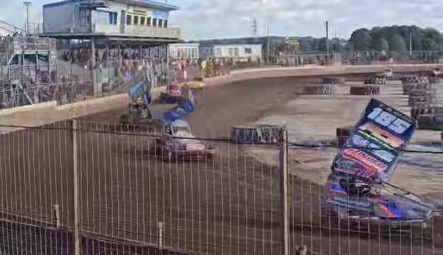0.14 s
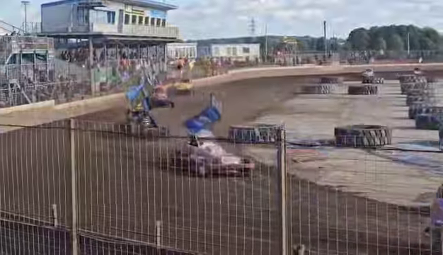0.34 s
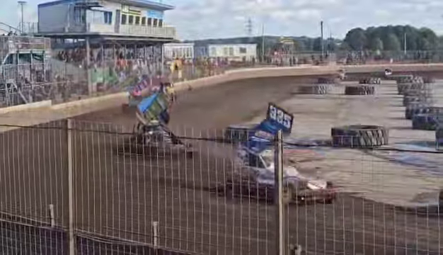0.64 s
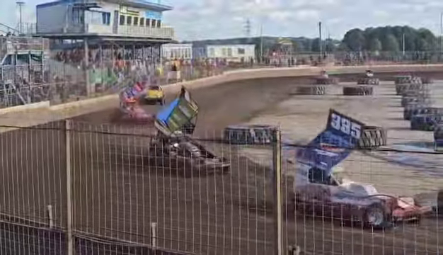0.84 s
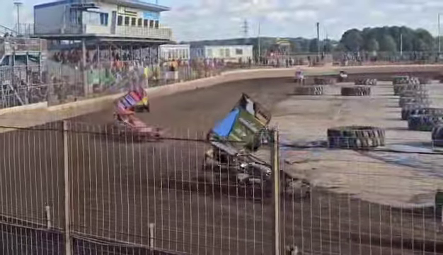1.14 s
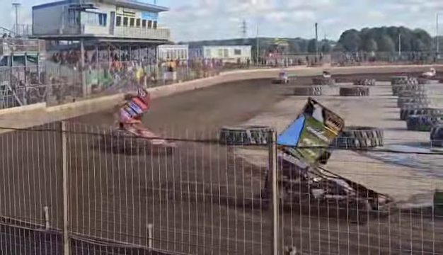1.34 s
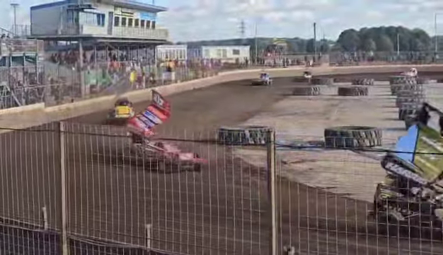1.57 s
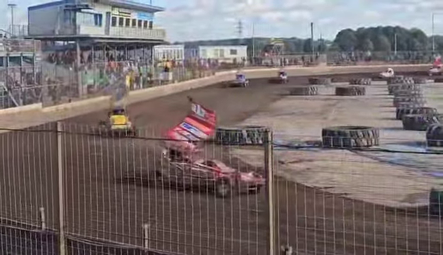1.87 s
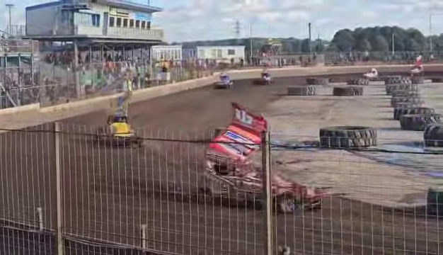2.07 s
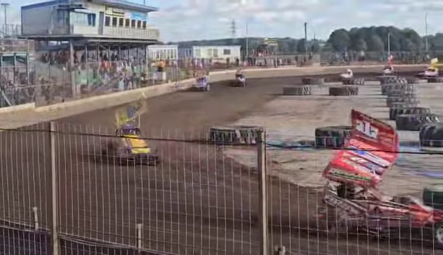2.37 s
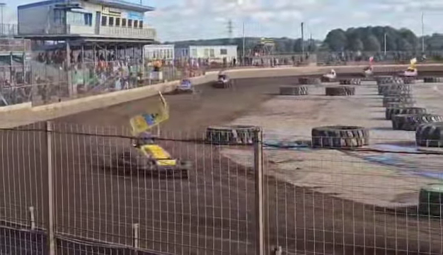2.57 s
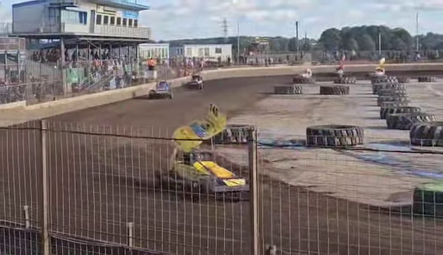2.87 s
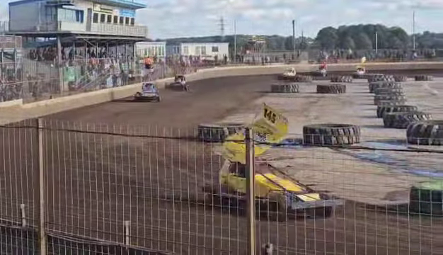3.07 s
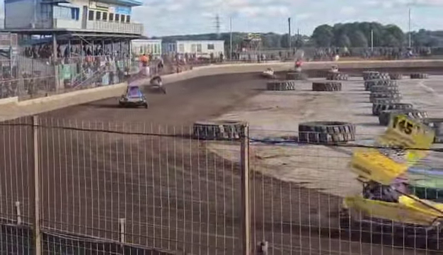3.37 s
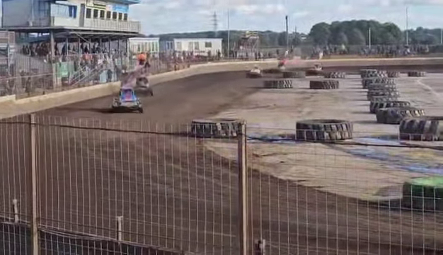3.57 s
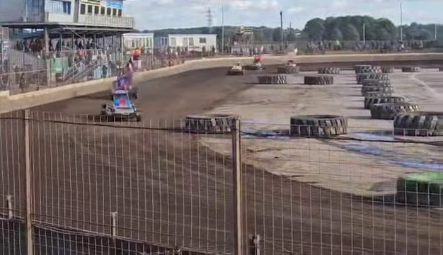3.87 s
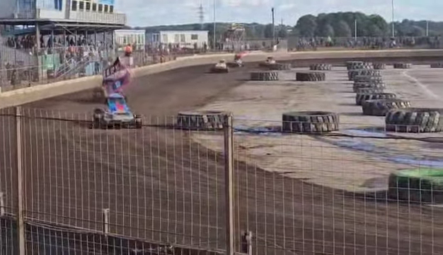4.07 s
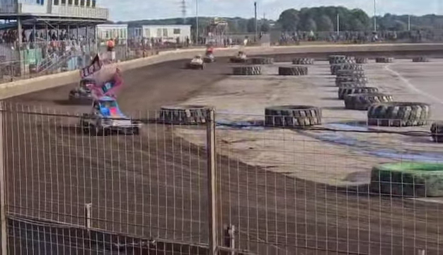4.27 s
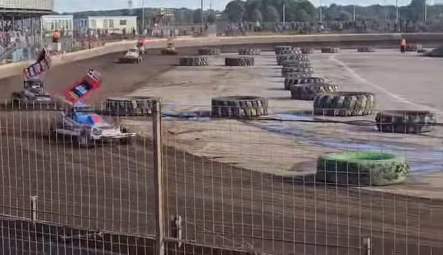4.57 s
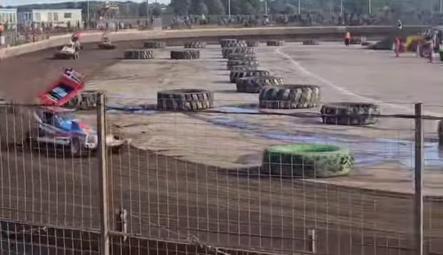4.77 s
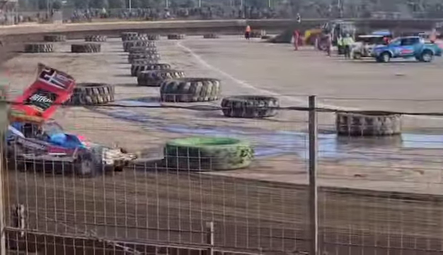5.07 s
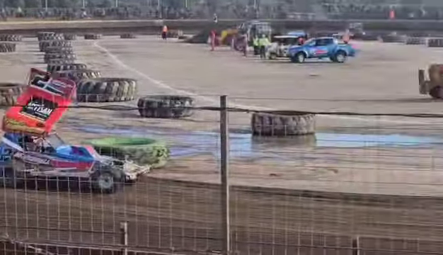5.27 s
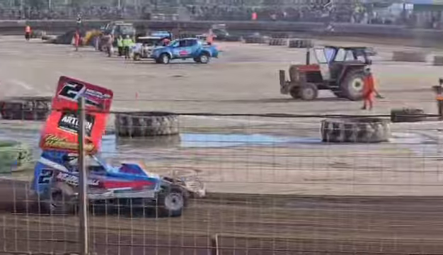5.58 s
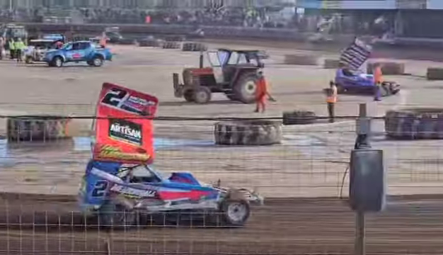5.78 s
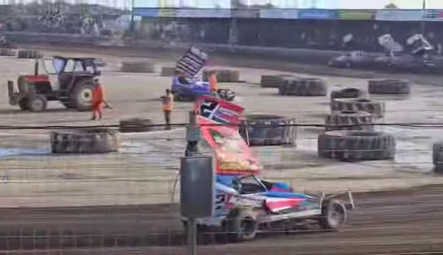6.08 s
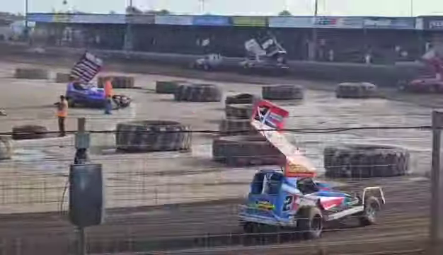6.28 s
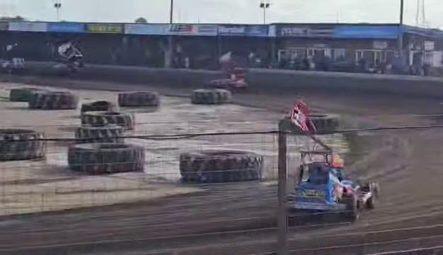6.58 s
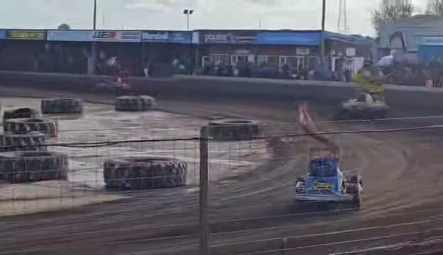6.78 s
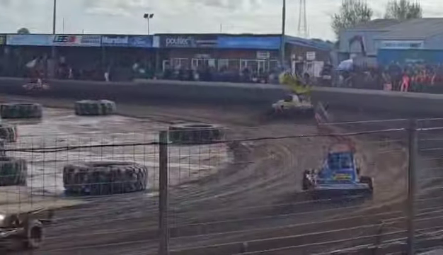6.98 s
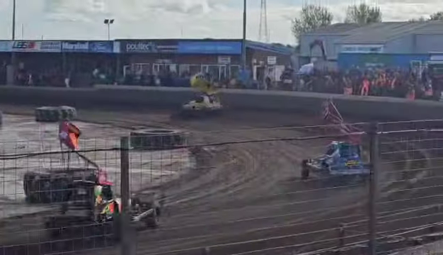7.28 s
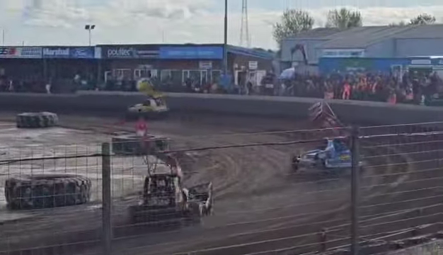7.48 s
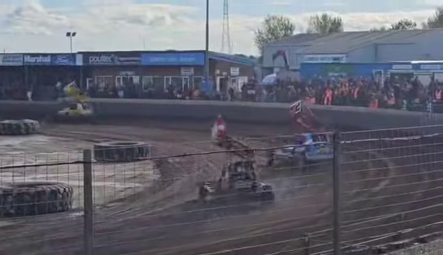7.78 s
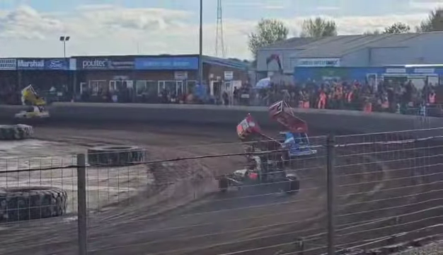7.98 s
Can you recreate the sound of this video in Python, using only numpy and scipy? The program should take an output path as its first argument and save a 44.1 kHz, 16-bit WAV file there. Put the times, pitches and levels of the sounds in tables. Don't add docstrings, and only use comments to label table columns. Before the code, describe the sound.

A pack of V8 race cars drones around an outdoor dirt oval, heard in stereo from a phone behind a wire fence. Close cars pass with cracking rasp and bright gas hiss, most densely in the first two and a half seconds, as stones snap on the wire. After a thinner stretch of distant growl, another car blasts by near five and a half seconds, then one more near seven.

```python
import sys
import numpy as np
from scipy import signal
from scipy.fft import rfft, irfft, next_fast_len
from scipy.io import wavfile
from scipy.ndimage import uniform_filter1d, map_coordinates

SR = 44100
rng = np.random.default_rng(int(sys.argv[2]) if len(sys.argv) > 2 else 0)


def store_pcm(level_fs):
    pcm = np.round(np.clip(level_fs, -1, 1) * 32767).astype(np.int16)
    wavfile.write(sys.argv[1], SR, np.atleast_2d(pcm).T)


def volts(x):
    e = np.asarray(x, float) / 20
    return 10 ** e


N = 358974


def unit(x):
    return x / np.sqrt(np.mean(x ** 2) + 1e-20)


def along(points, hz):
    f, v = np.transpose(points)
    return np.interp(np.log(hz + 1), np.log(f + 1), v)


def curves(rows):
    s, *cols = np.transpose(rows)
    return [np.interp(np.arange(N) / SR, s, c) for c in cols]


def wobble(rate):
    coarse = np.arange(0, N + 64, 32)
    knots = rng.standard_normal(int(N * rate / SR) + 4)
    return np.interp(np.arange(N), coarse, map_coordinates(knots, [coarse * rate / SR]))


def coloured(x, points):
    m = 16384
    gain = volts(along(points, np.fft.rfftfreq(m, 1 / SR)))
    cep = irfft(np.log(gain + 1e-6), m)
    cep[1:m // 2] *= 2
    cep[m // 2 + 1:] = 0
    impulse = irfft(np.exp(rfft(cep)), m)
    size = next_fast_len(N + m)
    return irfft(rfft(x, size) * rfft(impulse, size), size)[..., :N]


def patchy(x, depth_db):
    z = signal.stft(x, nperseg=512)[2]
    field = uniform_filter1d(rng.standard_normal(z.shape), size=4, axis=0)
    field = uniform_filter1d(field, size=6, axis=1)
    return signal.istft(z * volts(depth_db * unit(field)), nperseg=512)[1][:N]


def exhaust_orders():
    # [start/s, length/s, pitch/Hz, level/dB]
    holds = [(0, 0.21, 257.7, -16), (0.2, .2, 243, -16.5), (0, .65, 92, -21.5), (0.7, 0.29, 313.3, -29.5),
             (1.35, 0.14, 500, -27.5), (1.14, 0.19, 254.2, -18.5), (1.32, 0.5, 216, -20.5),
             (1.7, 0.34, 102, -23), (1.9, 0.32, 358.3, -30), (2, 0.34, 294, -27), (2.3, 0.16, 242.1, -18.5),
             (2, 0.51, 89, -20.5), (2.5, 0.43, 258, -22.5), (2.559, 0.26, 95, -25),
             (2.852, 0.26, 90.3, -24.5), (2.5, 0.25, 156, -27), (3, 0.29, 92, -25.5),
             (3.421, .13, 96.5, -20), (3.5, 0.18, 250, -21.5), (3.5, 0.284, 243.2, -18.5),
             (3.8, 0.31, 275, -23.5), (3.5, .69, 103, -24.5), (3.898, 0.27, 353, -31),
             (4, 0.17, 580, -32.5), (4, 0.13, 545, -29), (4, 0.18, 245, -22), (4.5, 0.12, 320.5, -25.5),
             (5.0, 0.23, 245, -19), (5.5, 0.453, 224, -18), (6, .25, 224, -23), (6.5, 0.22, 238, -21),
             (6.5, 0.13, 372, -30.5), (7, 0.34, 172, -24), (6.5, 0.39, 103, -26.5), (7, 0.17, 416, -24),
             (7.5, 0.35, 240, -25.5), (7.781, 0.46, 420.3, -31), (7.749, 0.49, 540, -35.5),
             (8, 0.36, 163, -24), (0.7, .14, 277, -23), (0.3, .2, 152, -25), (5, .12, 196, -22),
             (6, .16, 138, -26), (7, 0.18, 101, -26), (7.33, .2, 86, -28.5), (7.5, .25, 265, -24.5),
             (7.85, .3, 68, -30.5), (7, .25, 237, -26),
             (2.2, .42, 51, -33), (2.95, .95, 47, -40), (5.27, .36, 47, -36), (4.52, .3, 240, -25.5),
                (3.4, .2, 252, -25), (4.05, .3, 262, -29), (4.55, .3, 560, -33.5), (5.05, 0.31, 520, -32),
                (1.2, .18, 135, -24), (6.3, .4, 50, -42), (7.48, .15, 380, -30)]
    # [start/s, length/s, from/Hz, to/Hz, level/dB]
    glides = [(0.301, 0.27, 246, 283.6, -20.5), (0.215, 0.41, 334, 360, -36),
              (0.45, 0.97, 250, 239.3, -25.5), (0.737, 0.22, 276, 322.8, -22.5),
              (0.558, 0.33, 180, 166, -22), (.86, 0.33, 172, 189.2, -23.5), (0.65, 0.557, 100, 114, -22),
              (0.954, 0.25, 79, 75.7, -26), (1.4, 0.554, 80, 89.9, -25), (1.418, 0.23, 286, 297, -26),
              (1.702, 0.2, 240, 291, -20.5), (2.14, 0.163, 216, 250, -19.5),
              (2.623, 0.426, 211, 222.5, -20.5), (3.093, 0.388, 227, 248.2, -24),
              (3.799, 0.61, 230, 211.5, -22.5), (4.5, 0.57, 203, 233, -18.5),
              (5.199, 0.44, 230, 242.4, -21), (5.52, 0.408, 174, 216.8, -19), (5.55, 0.167, 458, 493, -26),
              (5.919, 0.459, 76, 101.6, -28.5), (7.16, 0.27, 184, 207.4, -22),
              (7.25, 0.53, 166, 156.6, -26.5), (7.624, 0.47, 228, 264, -27.5), (6.3, .26, 86, 98, -28),
              (5.25, 0.298, 275, 310, -26), (1.95, 0.203, 180, 140, -24), (4.4, .22, 228, 243, -22)]
    # [start/s, length/s, from/Hz, top/Hz, level/dB]
    blips = [
        (2.236, 0.283, 420, 449, -22.5),
        (6.1, .66, 170.1, 205.8, -19.5),
    ]
    fade_s = .12
    flutter_db = .8 * wobble(14) + 1.04 * wobble(5)
    drift_hz = 1.2 * wobble(20) + 1.41 * wobble(7)

    def ramp(u):
        return u

    def arch(u):
        return np.sin(np.pi * u) ** 2

    played = [(s, n, hz, hz, db, ramp) for s, n, hz, db in holds]
    played += [(*r, ramp) for r in glides] + [(*r, arch) for r in blips]
    out = np.zeros(N)
    for k, (s, length, from_hz, to_hz, db, shape) in enumerate(played):
        first = max(round((s - fade_s / 2) * SR), 0)
        last = min(round((s + length + fade_s / 2) * SR), N)
        i = np.arange(first, last)
        t = i / SR - s
        own = (i + 50021 * k) % N
        fade = np.clip(np.minimum(t, length - t) / fade_s + .5, 0, 1)
        hz = from_hz + (to_hz - from_hz) * shape(np.clip(t / length, 0, 1))
        turn = 2 * np.pi * np.cumsum(hz + drift_hz[own]) / SR
        out[i] += fade * volts(db + 3.5 + flutter_db[own]) * np.sin(turn + k)
    return out


def throttle():
    # [t/s, level/dB]
    across = [
        (0, -29.5),
        (.4, -32.5),
        (.8, -28.5),
        (1.5, -29.5),
        (2.8, -31.5),
        (3.55, -26),
        (4.5, -26),
        (4.95, -27.5),
        (6.6, -28.5),
        (8.14, -26),
    ]
    # [start/s, length/s, hiss level/dB, rasp level/dB]
    close_cars = [(-.05, 0.17, -29, -28), (0.257, 0.094, -27.5, -60), (0.492, 0.24, -32, -31.5),
                  (0.84, 0.28, -53, -53), (1.148, 0.14, -64, -25), (1.247, 0.16, -39, -31.5),
                  (1.41, 0.41, -43.5, -55), (1.674, 0.35, -34, -36), (1.792, 0.17, -29, -38),
                  (2.048, 0.21, -27, -26), (2.229, 0.13, -24.5, -26), (2.351, 0.17, -26.5, -30),
                  (2.525, 0.098, -36, -47), (2.706, .06, -48, -58), (2.95, 0.027, -37, -59),
                  (2.76, 0.2, -55, -58), (3.68, 0.34, -44.5, -57), (4.42, 0.096, -43.5, -25),
                  (5.148, 0.61, -41, -31.5), (5.328, 0.037, -31, -50), (5.375, .035, -30, -50),
                  (5.477, 0.07, -24, -31), (5.555, 0.23, -26, -29.5), (5.754, 0.18, -26.5, -28.5),
                  (5.934, 0.53, -32, -34.5), (6.457, 0.24, -43.5, -38), (6.71, 0.6, -37.5, -30.5),
                  (7.048, 0.21, -28, -30), (7.202, 0.13, -25, -38), (7.293, 0.12, -22.5, -32),
                  (7.439, 0.15, -27, -39), (3.837, 0.1, -45, -50), (0.136, 0.085, -34.5, -48)]
    open_s, shut_s, far_hiss_db = 0.073, 0.086, -50.5
    t = np.arange(0, N + 64, 64) / SR
    s, length, hiss_db, rasp_db = np.transpose(close_cars)[..., None]
    opening = np.minimum((t - s) / open_s + .5, (s + length - t) / shut_s + .5)
    opening = np.clip(opening, 0, 1) ** 2
    rasp = volts(2 * np.interp(t, *np.transpose(across))) + ((volts(rasp_db) * opening) ** 2).sum(0)
    hiss = volts(2 * far_hiss_db) + ((volts(hiss_db) * opening) ** 2).sum(0)
    return [np.interp(np.arange(N) / SR, t, 10 * np.log10(p)) for p in (rasp, hiss)]


def closeness():
    return np.clip((throttle()[1] + 44) / 14, 0, 1)


def firings(cycle_hz, uneven, jitter, scatter_db):
    turns = np.cumsum(cycle_hz) * 8 / SR
    at = np.flatnonzero(np.diff(np.floor(turns)) > 0)
    pattern = 1 + uneven * rng.standard_normal(8)
    luck = rng.standard_normal((N // 50, 2))[:len(at)]
    size = pattern[np.arange(len(at)) % 8] * volts(scatter_db * luck[:, 0])
    late = jitter * luck[:, 1] * SR / 8 / cycle_hz[at]
    return np.bincount(np.clip(at + late, 0, N - 1).astype(int), size, N)


def near_cars():
    # [t/s, cycle/Hz]
    engine_cycle = [(0, 31.3), (.9, 38.4), (1.6, 44), (2.2, 46), (2.28, 55), (2.37, 56), (2.56, 51),
                    (2.8, 20), (5.5, 36), (6.1, 27.6), (7, 34), (7.4, 49.7), (7.7, 51)]
    # [f/Hz, level/dB]
    close_rasp = [(220, -42), (380, -5.5), (436, -3.5), (533, -6.5), (1430, -17.5), (1710, -23),
                  (2600, -28.5), (3380, -103), (5720, -120)]
    distant_rasp = [(220, -16.5), (380, -3.5), (422, -1), (646, -2.5), (951, -13.5), (1030, -14),
                    (2600, -40), (3380, -49.5), (5720, -120)]
    # [f/Hz, level/dB]
    behind_hiss = [(1470, -46), (2700, -6), (4340, -0.5), (5120, 0.5), (6820, -1), (7470, 2.5), (8700, -6),
                   (10300, -7.5), (11600, -2.5), (13200, -16.5)]
    side_hiss = [(1350, -15.5), (2300, -10.5), (2900, -7.5), (5220, 0), (5990, -5.5), (7410, -4.5),
                 (9850, -17.5), (11700, -13), (13200, -22)]
    distant_hiss = [(1350, -26), (2300, -10.5), (2660, -6.5), (4320, -3), (5910, -9), (7150, -11.5),
                    (9940, -22), (11400, -23), (13200, -22.5)]
    rasp_db, hiss_db = throttle()
    beats = firings(curves(engine_cycle)[0], uneven=.4, jitter=0.05, scatter_db=1.0)
    puff_s = 0.0018
    puff = unit(np.abs(signal.lfilter([1], [1, -np.exp(-1 / (puff_s * SR))], beats)))
    load = closeness()

    def jet(steady):
        return rng.standard_normal(N) * (steady + load * puff) / (steady + load)

    cracks = patchy(0.35 * load * unit(beats) + jet(1.0), depth_db=1.5)
    rasp = np.sqrt(load) * unit(coloured(cracks, close_rasp))
    rasp = rasp + np.sqrt(1 - load) * unit(coloured(cracks, distant_rasp))
    sputter_db = 0.81 * wobble(9.7) + load * 2.2 * wobble(190)
    gas = patchy(jet(2.6) * volts(sputter_db), depth_db=2.5)
    turned = np.interp(np.arange(N) / SR, (0.92, 3.7), [0, 1])
    behind = (1 - turned) * np.maximum(load, .39)
    side = turned * load
    shares = [(behind, behind_hiss), (side, side_hiss), (1 - behind - side, distant_hiss)]
    hiss = sum(np.sqrt(np.abs(share)) * unit(coloured(gas, colour)) for share, colour in shares)
    return volts(rasp_db - 1.0) * rasp + volts(hiss_db - 1.72) * hiss


def bursts():
    # [t/s, cycle/Hz, level/dB, pipe resonance/Hz]
    passes = [
        [(1.99, 38.14, -41, 610), (2.06, 39.6, -29.5, 641), (2.18, 41.7, -28, 663), (2.27, 42, -36, 690)],
        [(2.22, 52.1, -40, 1040), (2.29, 54.34, -23.5, 1070), (2.37, 56.6, -25, 1010), (2.48, 53.7, -21, 1023),
         (2.57, 51.3, -43, 1000)],
        [(5.42, 55, -47, 1060), (5.6, 57.85, -32, 1060), (5.75, 60.7, -48, 1080), (5.93, 60, -33, 1060)],
        [(6.03, 27.9, -27.5, 880), (6.2, 28.14, -30, 829.7), (6.33, 29, -29.5, 790), (6.47, 30.2, -28, 799)],
        [(7.15, 51.06, -36, 1020), (7.28, 52.73, -26, 1050), (7.4, 54.1, -28, 980), (7.5, 52.4, -26.5, 890),
         (7.61, 50.9, -43, 815)],
    ]
    pipe_width = .085
    out = np.zeros(N)
    order = np.arange(9, 44)[:, None]
    for rows in passes:
        s, cycle_hz, db, pipe_hz = np.transpose(rows)
        i = np.arange(round(s[0] * SR), round(s[-1] * SR))
        cycle, level, pipe = (np.interp(i / SR, s, c) for c in (cycle_hz, db, pipe_hz))
        knots = rng.standard_normal((2, len(order), 6))
        shake, swell = (signal.resample(k, len(i), axis=1) for k in knots)
        gain = .65 * (12 / order) ** 1.64
        for ratio, peak in [(1, 1), (1.36, .8), (1.95, .3)]:
            gain = gain + peak * np.exp(-(np.log(order * cycle / (ratio * pipe)) / pipe_width) ** 2)
        phase = order * 2 * np.pi * np.cumsum(cycle) / SR + .25 * shake + order ** 2
        stack = gain * volts(2.5 * swell) * np.sin(phase)
        out[i] += volts(level - 0.5) * signal.windows.tukey(len(i), .25) * unit(stack.sum(0))
    return out


def grit():
    # [t/s, peak level/dB, ring/Hz]
    stones = [(0.2652, -28, 6160), (0.2856, -29, 11300), (0.2975, -9.5, 7600), (0.4763, -21, 5160),
              (1.293, -28, 4970), (1.3049, -24, 5030), (1.65, -18, 7300), (1.6664, -15, 4530),
              (1.6885, -19, 5270), (1.725, -10, 7150), (1.7373, -4.5, 6900), (1.7892, -17, 7060),
              (1.8002, -11, 7600), (1.8406, -18, 6620), (1.89, -9, 7460), (1.9067, -2, 7460),
              (2.0886, -22, 5500), (2.1783, -15, 7480), (2.1967, -8, 6330), (2.257, -17, 7300),
              (2.3849, -16, 4870), (2.4068, -13, 6850), (2.4794, -19, 6530), (2.5565, -15, 8300),
              (2.7296, -21, 4400), (2.9574, -23, 7320), (3.7263, -24, 5270), (3.854, -31, 4500),
              (3.868, -18, 5200), (3.9294, -20, 4670), (5.3347, -27, 6450), (5.3476, -23, 7100),
              (5.3842, -15, 6230), (5.4983, -17, 6380), (5.5741, -24, 6480), (5.5996, -19, 7420),
              (5.7984, -32, 7270), (6.0045, -12, 5340), (6.2411, -13, 6600), (6.294, -17, 5260),
              (7.0458, -23, 7430), (7.0692, -23, 5360), (7.2618, -18, 6420), (7.3147, -26, 6740),
              (7.38, -22, 7430)]
    # [f/Hz, level/dB]
    wire = [(1500, -30), (4000, -1), (7500, 1), (9500, -3), (11500, 0), (13000, -10), (14000, -90)]
    out, t = np.zeros(N + 600), np.arange(600) / SR
    for s, db, hz in stones:
        crack = np.diff(rng.standard_normal(len(t) + 1)) * volts(-60 * t / .004)
        ring = 0.6 * np.sin(2 * np.pi * hz * t) * volts(-60 * t / .009)
        out[round(s * SR):][:len(t)] += volts(db - 2) * (crack + ring)
    return coloured(out[:N], wire)


def blurred_pack(count=9):
    # [t/s, level/dB]
    strength = [(0.0, -17), (1.49, -16.5), (2.29, -15), (3.08, -18), (4.71, -16), (5.35, -14.5),
                (5.78, -20), (6.12, -18), (6.51, -23.5), (6.94, -17), (7.46, -20), (8.14, -17.5)]
    # [f/Hz, level/dB]
    burble_colour = [(18, -49), (30, -11), (59, -10), (91, -0.5), (150, -9.5), (200, -31), (330, -120)]
    drone_colour = [(82, -33.5), (140, -6.5), (167, -5.5), (236, 3.5), (307, -6.5), (420, -18.5),
                    (550, -44), (920, -120)]
    drone_db, = curves(strength)
    burble_db = drone_db - 4.5 - .5 * np.arange(N) / SR
    blur = 0
    for mean_hz in np.linspace(24, 40, count):
        level = volts(2.95 * wobble(1.607))
        cycle_hz = mean_hz * (1 + .06 * wobble(1.2))
        blur = blur + level * unit(firings(cycle_hz, uneven=2.18, jitter=.05, scatter_db=2))
    blur = unit(blur) + 0.42 * rng.standard_normal(N)
    burble = volts(burble_db - 2.0) * unit(coloured(blur, burble_colour))
    return burble + volts(drone_db - 2.5) * unit(coloured(blur, drone_colour))


def placed(x):
    # [from/s, to/s, left lag at start/samples, at end/samples]
    sweeps = [(0, .2, 0, 2), (.2, .5, 3, 5), (.5, 1.22, 17, 18), (1.22, 1.36, 2, 3), (1.36, 1.62, 19, 20),
              (1.62, 1.98, 7, 7.4), (1.98, 2.44, 0, 0), (2.44, 2.76, 7.2, 5.8), (2.74, 5, 18, 18),
              (5, 5.42, 17, 12), (5.42, 5.95, -2, -1.5), (5.95, 6.24, -10.5, -10), (6.24, 6.6, -14, -14),
              (6.6, 6.95, -11, -9.3), (6.95, 7.43, -7.7, -4.4), (7.43, 8.2, -3.5, -1)]
    out, t, x = np.zeros((2, N)), np.arange(N) / SR, np.pad(x, 64)
    for s0, s1, lag0, lag1 in sweeps:
        i = np.flatnonzero((t > s0 - .03) & (t < s1 + .03))
        fade = np.clip(np.minimum(t[i] - s0 + .03, s1 + .03 - t[i]) / .06, 0, 1)
        lag = np.interp(t[i], [s0, s1], [lag0, lag1])
        out[0, i] += fade * map_coordinates(x[i[0]:i[-1] + 129], [i - i[0] + 64 - lag])
        out[1, i] += fade * x[i + 64]
    return out


def scene():
    # [t/s, left lag/samples]
    pack_lag = [(0, 2), (.3, 4), (.6, 18), (1.5, 18), (1.7, 8), (2.1, 1), (2.5, 3), (2.8, 18), (4.5, 17),
                (5.3, 14), (5.5, 8), (6, 2), (6.3, -1), (8.14, -2)]
    # [f/Hz, level/dB]
    diffuse = [(600, -32.5), (1200, -3), (2000, 6), (8000, 8.5)]
    # [f/Hz, level/dB]
    low_diffuse = [(60, -26), (250, -13), (600, -5), (1000, -6), (1800, -30)]
    drone = exhaust_orders() + blurred_pack()
    late = np.interp(np.arange(N) - curves(pack_lag)[0], np.arange(N), drone)
    direct = near_cars() + bursts() + grit()
    others = np.array([blurred_pack(count=2) + near_cars() for _ in range(2)])
    around_db = 5.0 - 15.5 * np.sqrt(closeness())
    around = volts(around_db) * coloured(others, diffuse) + coloured(others, low_diffuse)
    return volts(-1.0) * (np.array([late, drone]) + placed(direct) + around)


def thinned(x, under_db):
    # [f/Hz, share]
    weak = [(1500, 0), (2200, .3), (3400, .2), (7500, .1), (8600, .36), (13000, .4)]
    size, shift = 1024, 965
    n, k = np.arange(2 * size) + .5, np.arange(size) + .5
    hz = k * SR / 2 / size
    window = np.sqrt(2 / size) * np.sin(np.pi * n / 2 / size)
    lapped = window * np.cos(np.pi / size * k[:, None] * (n + size / 2))
    lead, count = 2 * size - shift, N // size + 5
    mid_side = np.array([x[0] + x[1], x[0] - x[1]]) / 2
    blocks = np.pad(mid_side, ((0, 0), (lead, count * size - N - lead))).reshape(2, count, size)
    z = np.concatenate([blocks[:, :-1], blocks[:, 1:]], axis=2) @ lapped.T
    cell = (z ** 2).reshape(2, count - 1, -1, 8).mean(3)
    cell = np.repeat(uniform_filter1d(cell, size=2, axis=1), 8, axis=2)
    around = uniform_filter1d(cell.sum(0), size=64, axis=1)
    kept = (cell > around * volts(2 * under_db)) | (hz < 1900)
    edge_hz = 13250 - 340 * np.round(760 / 340 * np.abs(wobble(26)[::size]))
    kept &= hz < np.resize(edge_hz, count - 1)[:, None]
    kept &= z ** 2 > along(weak, hz) ** 2 * cell
    scatter = uniform_filter1d(rng.standard_normal((count - 1, size // 8)), size=2, axis=0)
    scatter = np.repeat(scatter, 8, axis=1) * (hz > 1000)
    y = (z * kept * volts(1.6 * unit(scatter))) @ lapped
    joined = (y[:, 1:, :size] + y[:, :-1, size:]).reshape(2, -1)
    mid, side = joined[:, lead - size:][:, :N]
    return np.array([mid + side, mid - side])


def low_pass(x):
    return signal.sosfilt(signal.butter(12, 13370, fs=SR, output="sos"), x)


def record(dry):
    # [f/Hz, level/dB]
    bass_cut = [(5, -59), (25, -23), (33, -11.5), (45, 3), (70, -0.5)]
    # [f/Hz, left-right level/dB]
    ports = [(60, 1), (180, 0.5), (510, 1), (1500, 0.5), (4370, -4.5), (12800, 0)]
    dry = coloured(dry, bass_cut)
    wide = (dry - 0.016 * dry[::-1]) * volts(2.0)

    def tilt(share):
        return [(hz, share * db) for hz, db in ports]

    x = np.array([coloured(wide[0], tilt(0.97)), coloured(wide[1], tilt(-0.15))])
    x = x / (1 + np.abs(x / 1.05) ** 4) ** (1 / 4)
    mix = thinned(x, under_db=-7)
    return low_pass(mix)


dry = scene()
out = record(dry)
store_pcm(out)
```